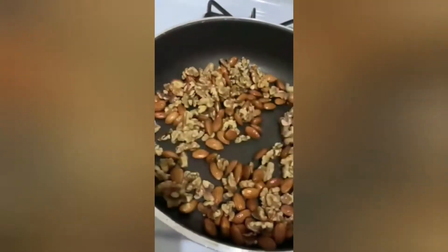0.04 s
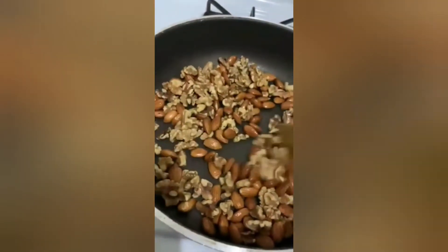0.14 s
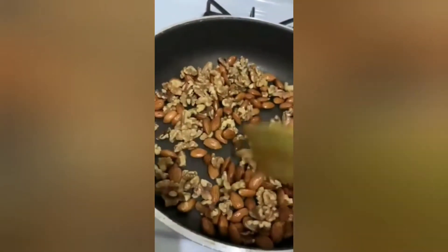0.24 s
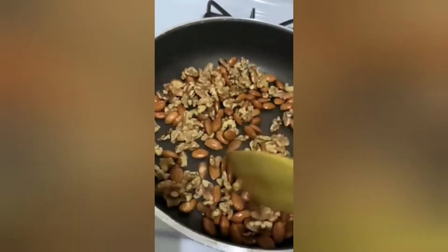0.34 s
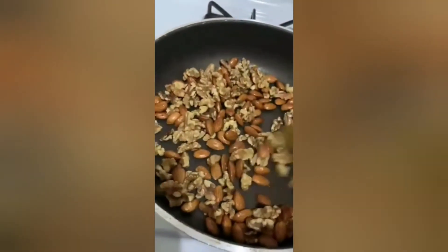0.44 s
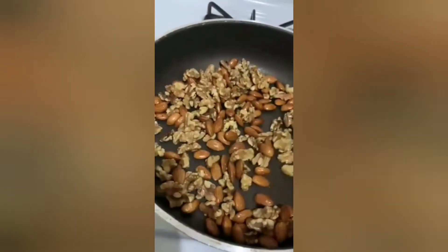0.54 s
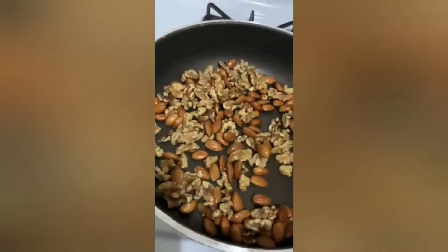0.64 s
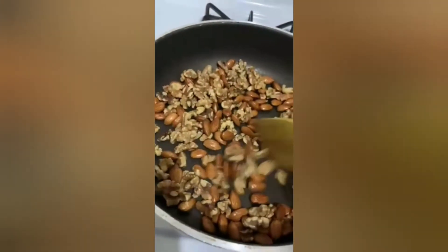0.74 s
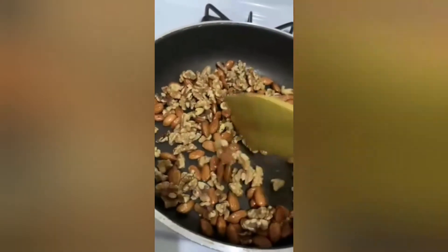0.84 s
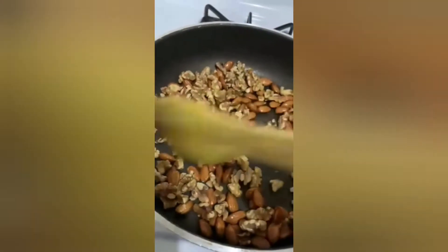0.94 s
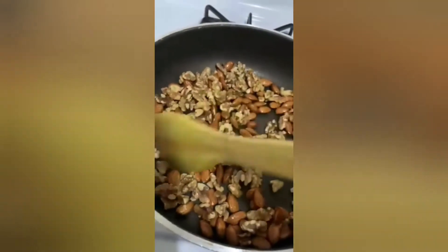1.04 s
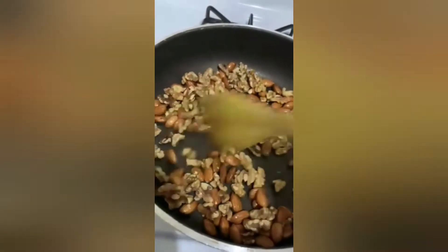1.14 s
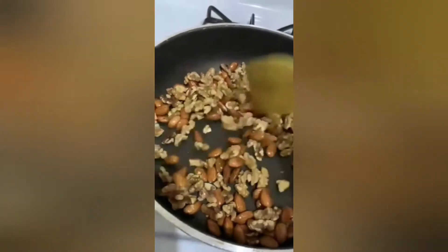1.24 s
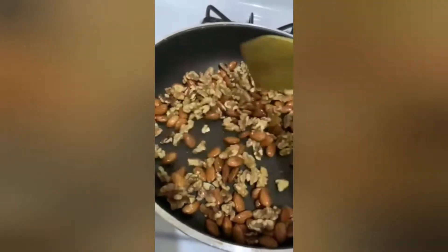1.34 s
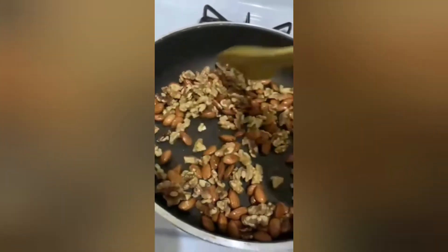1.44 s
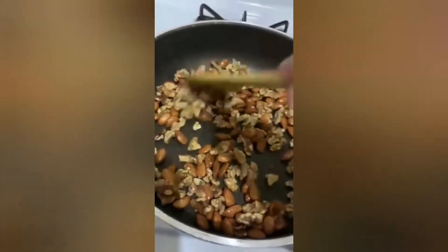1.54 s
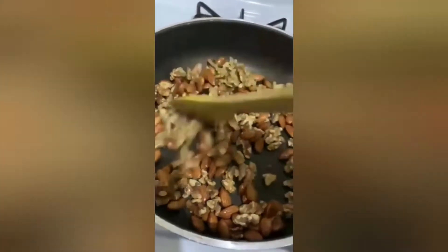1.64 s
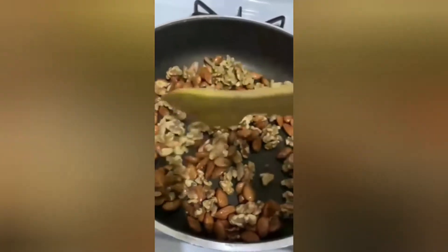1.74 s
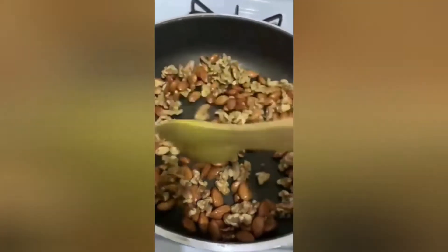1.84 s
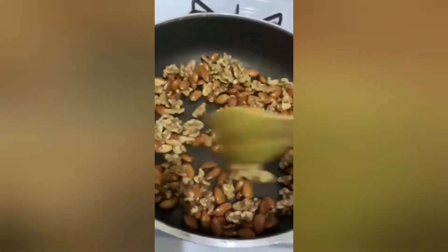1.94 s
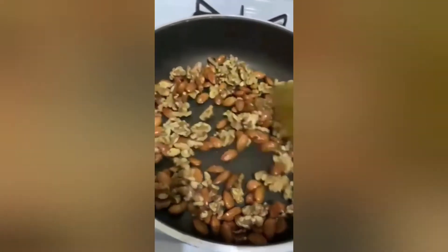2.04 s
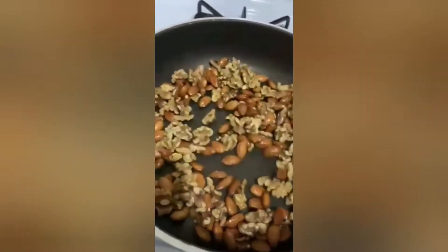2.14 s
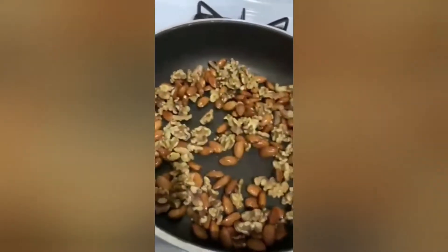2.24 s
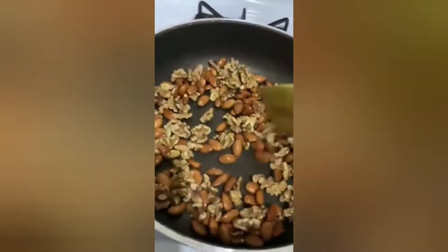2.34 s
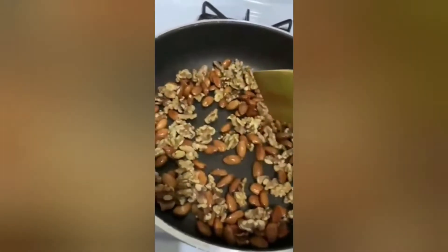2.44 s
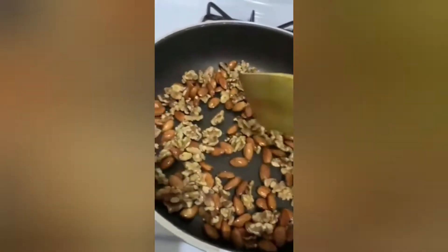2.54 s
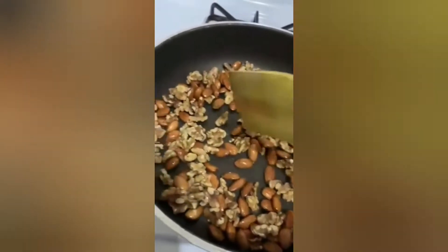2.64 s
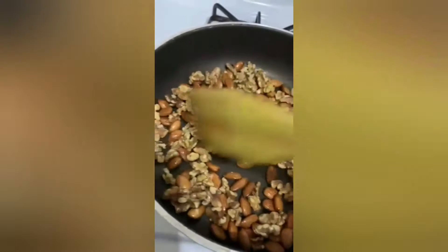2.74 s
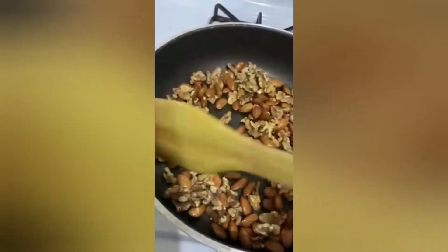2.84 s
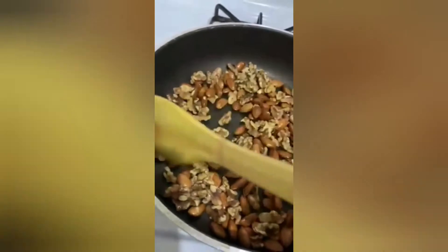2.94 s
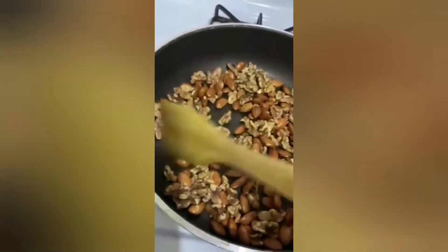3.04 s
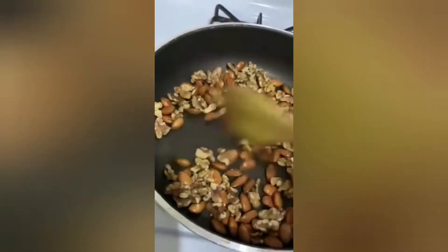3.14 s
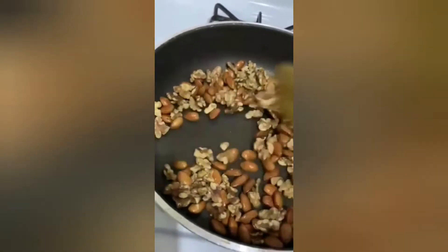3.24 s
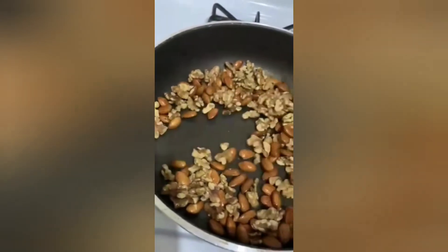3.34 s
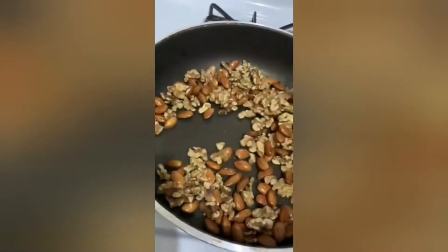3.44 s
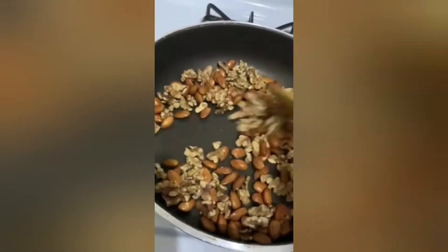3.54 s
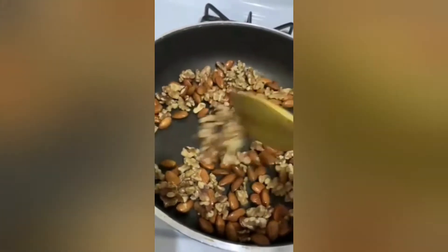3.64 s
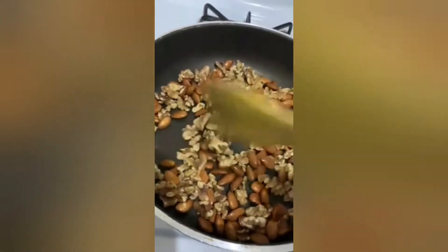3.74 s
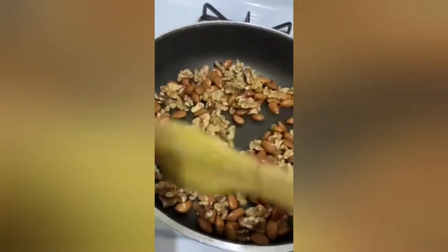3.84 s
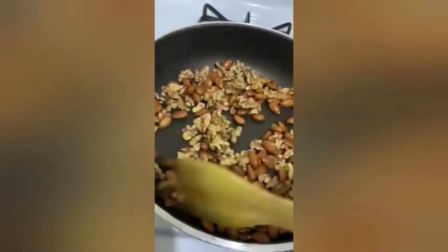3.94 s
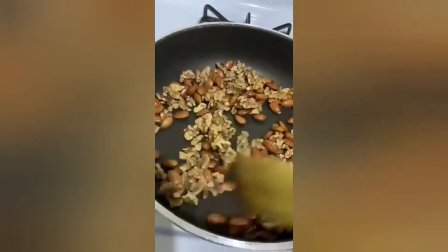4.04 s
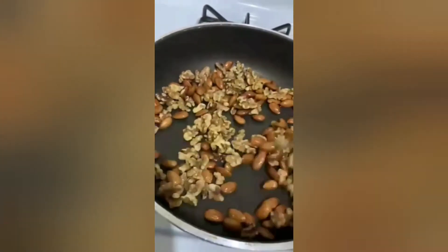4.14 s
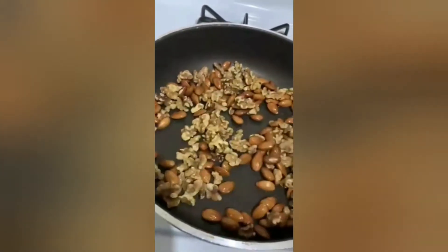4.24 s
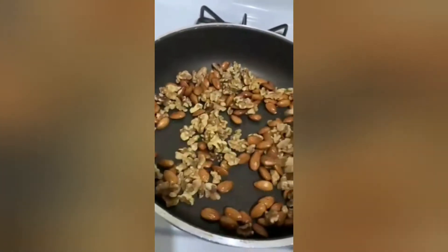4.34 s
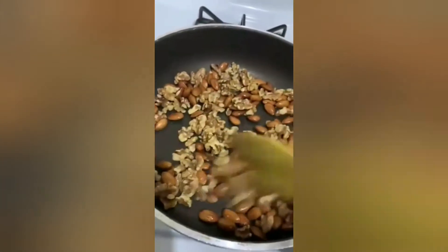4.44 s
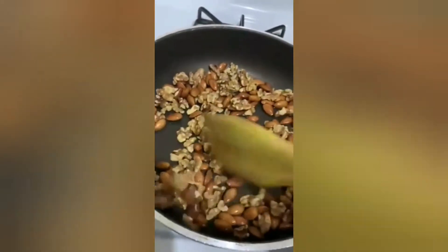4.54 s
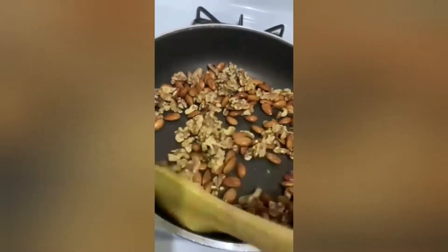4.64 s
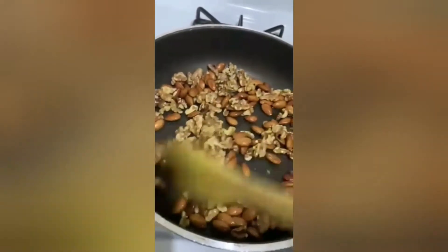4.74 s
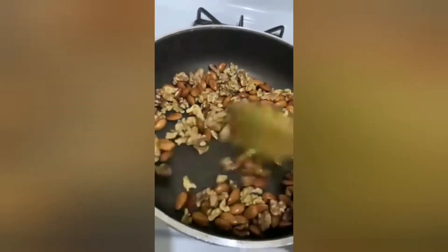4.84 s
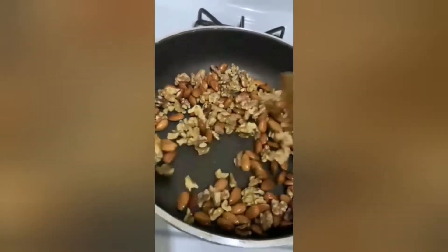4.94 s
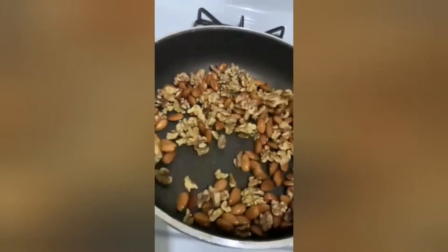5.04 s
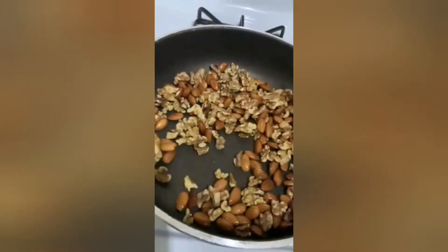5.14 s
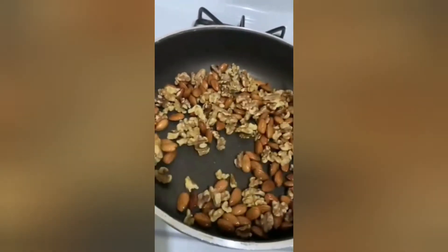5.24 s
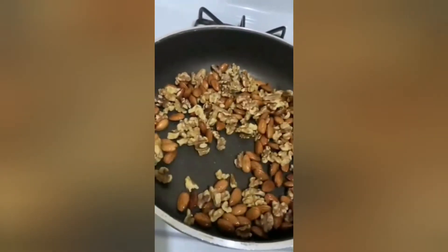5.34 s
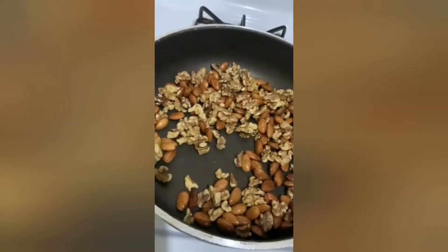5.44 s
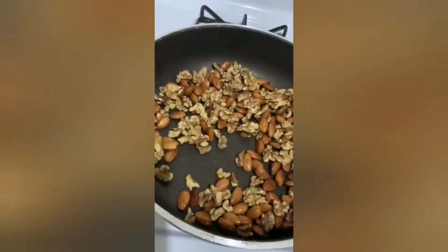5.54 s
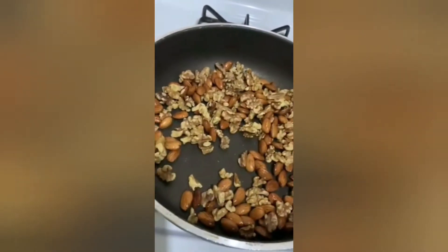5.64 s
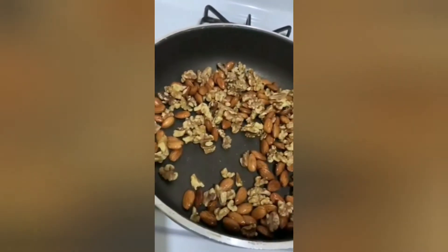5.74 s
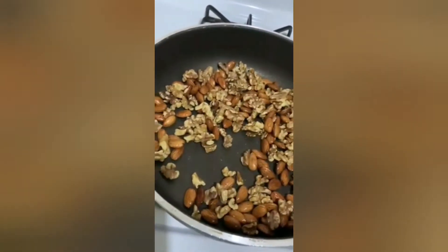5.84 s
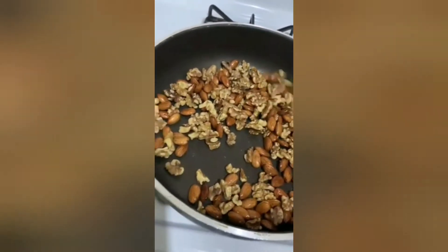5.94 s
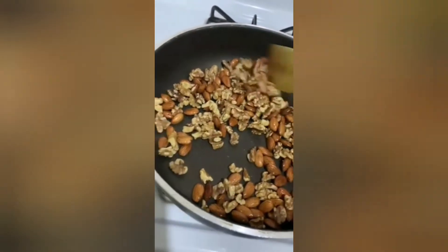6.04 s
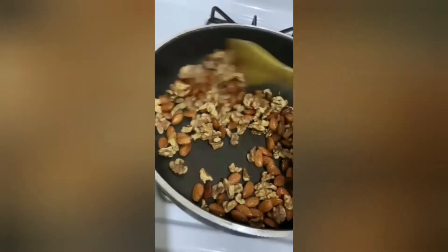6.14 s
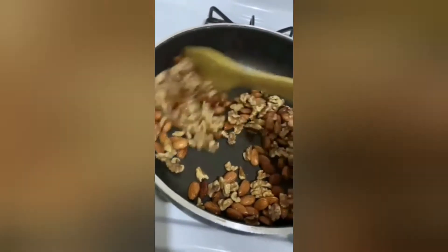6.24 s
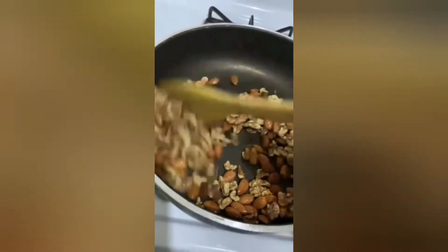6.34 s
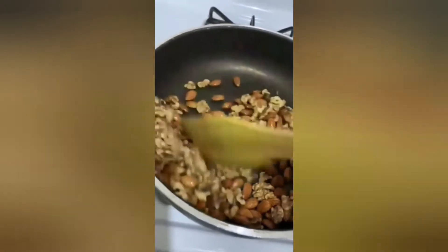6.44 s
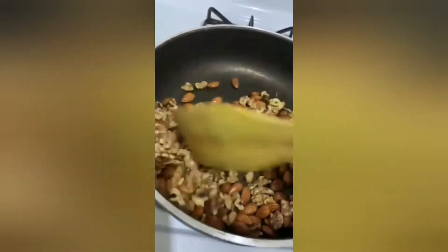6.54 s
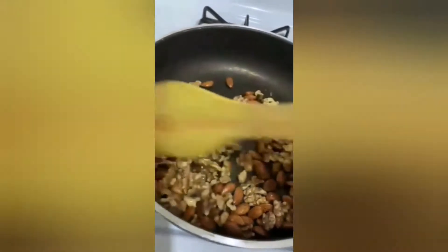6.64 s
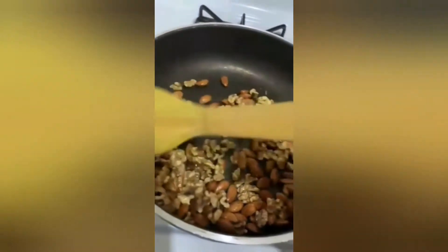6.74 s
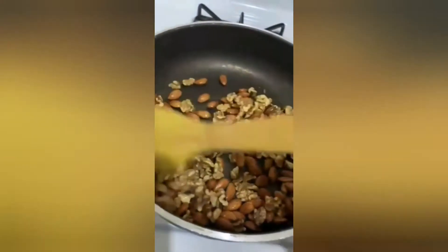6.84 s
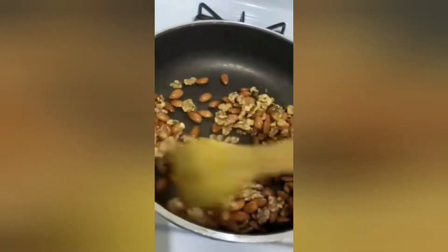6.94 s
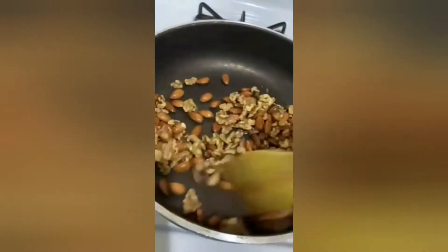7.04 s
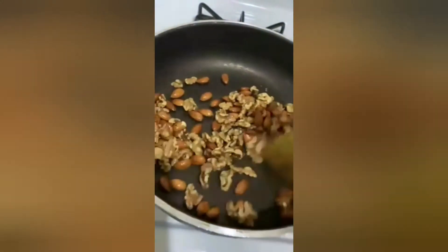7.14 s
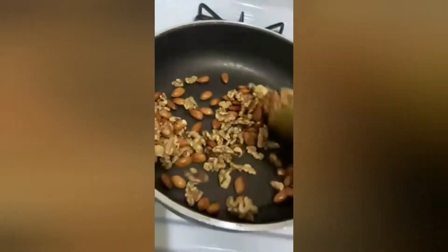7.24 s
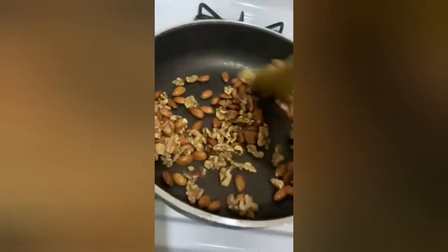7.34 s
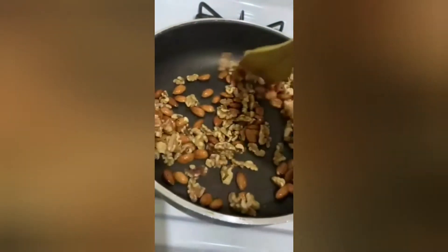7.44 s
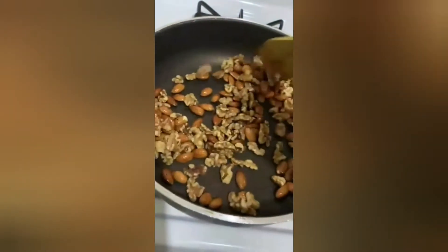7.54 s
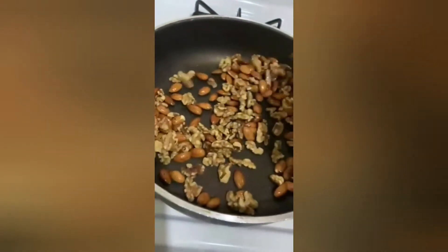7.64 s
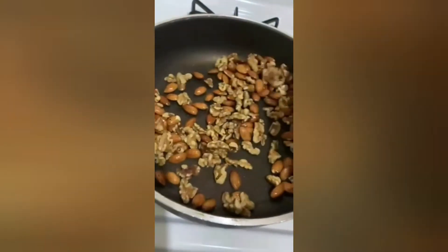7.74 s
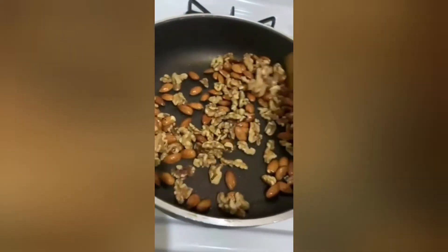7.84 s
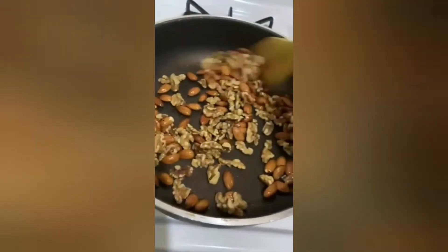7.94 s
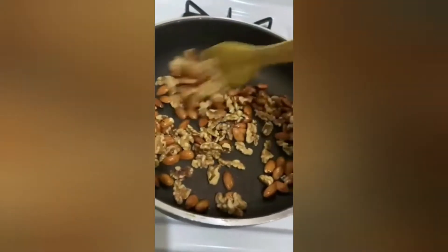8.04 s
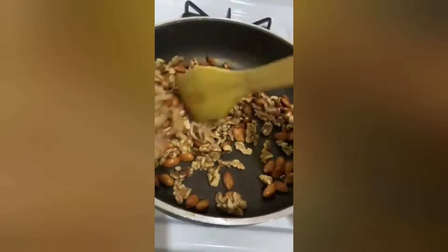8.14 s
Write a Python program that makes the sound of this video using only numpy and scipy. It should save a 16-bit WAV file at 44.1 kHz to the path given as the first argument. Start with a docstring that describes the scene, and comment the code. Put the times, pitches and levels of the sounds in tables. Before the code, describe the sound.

Close-up dry rattling of nuts pushed around a pan, woody spatula knocks and sharp little clicks over a very faint kitchen hum.

```python
"""Nuts stirred in a frying pan

Nuts are stirred with a wooden spatula in a pan on a stove, heard from close by in two channels.
Tumbling nuts are showers of small taps that ring the pan's modes; their sliding is coloured noise.
Spatula and larger nuts knock: a few woody cycles and a dry crack, with a brief ring of the pan.
Thin snaps are sharp pulses with a scatter of noise. Behind lie sparse kitchen echoes, broad noise,
a faint burner hiss and low hums that swell and fade."""
import sys
import numpy as np
from scipy import signal
from scipy.fft import rfft, irfft, next_fast_len
from scipy.io import wavfile
from scipy.ndimage import uniform_filter1d

SR = 44100
rng = np.random.default_rng(int(sys.argv[2]) if len(sys.argv) > 2 else 0)


def output_pcm(signal):
    """Save a mono or channel-first signal as 16-bit PCM at the path in sys.argv[1].

    Samples are clipped to [-1, 1] before scaling.
    """
    pcm = np.clip(np.atleast_2d(signal).T, -1, 1) * 32767
    wavfile.write(sys.argv[1], SR, np.round(pcm).astype(np.int16))


N = 362061
STRIKE = 3000  # samples in one strike, contact or burst

# Relative spectrum of dry sliding, also used for the burner: frequency_hz, density_db (per Hz)
SLIDE_SPECTRUM = [(800, 10), (2000, -0.5), (5000, 2.5), (6000, 2.5), (8000, 0.5), (10500, 2), (11850, -5.5),
                  (12150, -66)]
# Relative spectrum of a dry crack or click: frequency_hz, density_db (per Hz)
CRACK_SPECTRUM = [(500, 9), (1200, 9), (2200, 13.5), (3200, 13), (4500, 2.5), (7000, -13)]


def tumbling():
    """Nuts tap low modes softly and upper modes hard with dry clicks, and hiss as they slide over the pan."""
    # Pitch around which soft taps ring the pan as the heap moves over it: time_s, pitch_hz
    heap_pitch = [(0.2, 760), (1.15, 786), (1.9, 720), (2.3, 920), (3.05, 604), (3.6, 850), (4.4, 880),
                  (4.85, 790), (5.8, 433), (6.15, 786), (6.4, 865), (7.0, 970), (7.6, 850), (8.1, 890)]
    tumble_gain, tap_gain, hiss_gain = stirring()
    around_hz = np.interp(np.arange(N) / SR, *np.transpose(heap_pitch))
    soft, _ = taps(400, 300, 1560, contact_db=-4.5, around_hz=around_hz)
    hard, size = taps(260, 1550, 4000, contact_db=-4.5)
    clicks = signal.oaconvolve(size * rng.choice([-1., 1.], N), burst(0.0045))[:N]
    dry_clicks = gain_of(-16.5) * evened(colour(clicks, CRACK_SPECTRUM))
    body = tumble_gain * soft + tap_gain * (hard + dry_clicks)
    grains = gain_of(-15.5) * evened(colour(clicks, SLIDE_SPECTRUM))
    slide = noise(SLIDE_SPECTRUM, patchy_db=3.5) + grains
    return body, hiss_gain * slide


def stirring():
    """Gains of tumbling, hard taps and hiss: each surge climbs, holds and settles; powers add."""
    # Surges of stirring and of nuts scattering after knocks:
    # start_s, rise_s, hold_s, tumbling_db, hard_taps_db, hiss_db
    surges = [(-0.13, 0.097, 0.16, -62, -44.5, -44.5), (0.02, 0.1, 0.082, -37.5, -48, -49),
              (0.232, 0.1, 0.07, -37, -38.5, -39), (0.42, 0.046, 0.016, -47, -43.5, -44),
              (0.688, 0.021, 0.0048, -31.5, -39.5, -40), (1.041, 0.029, 0.0066, -31, -27.5, -30),
              (1.095, 0.041, 0.046, -29, -37, -66), (1.464, 0.013, 0.048, -36.5, -45.5, -43),
              (1.578, 0.027, 0.014, -33.5, -36.5, -41.5), (1.797, 0.037, 0.12, -32.5, -42, -40.5),
              (2.107, 0.13, 0.12, -43.5, -49.5, -47), (2.905, 0.0079, .005, -43, -65, -38),
              (3, 0.019, 0.075, -39, -50, -40), (3.047, 0.03, 0.069, -29.5, -36.5, -41.5),
              (3.258, 0.014, 0.08, -48, -49.5, -46), (3.437, 0.15, 0.004, -31.5, -37.5, -36),
              (3.847, 0.13, 0.053, -39, -41, -33.5), (4.057, 0.034, 0.12, -41, -44.5, -44.5),
              (4.289, 0.046, 0.074, -31.5, -35, -33.5), (4.467, 0.026, .005, -32, -39.5, -41),
              (4.617, 0.013, 0.085, -59, -64, -39), (4.709, 0.073, 0.085, -31.5, -34.5, -39.5),
              (4.96, 0.012, 0.074, -42, -48.5, -54), (5.648, 0.0065, 0.0092, -69, -58, -44),
              (5.62, 0.35, .115, -37.5, -48.5, -39), (6.007, 0.11, 0.13, -42, -52, -40),
              (6.186, 0.14, 0.069, -34.5, -43, -41), (6.691, 0.023, 0.027, -61, -58, -37.5),
              (6.782, 0.088, 0.31, -36.5, -43.5, -35.5), (7.077, 0.13, 0.079, -43.5, -43, -38.5),
              (7.287, 0.042, 0.21, -42.5, -48, -44.5), (7.612, 0.032, 0.0082, -48, -53, -41),
              (7.76, 0.13, 0.18, -38.5, -49.5, -37.5), (7.96, 0.07, 0.086, -29.5, -40, -38.5)]
    # Fall after a surge (dB per second): tumbling, hard_taps, hiss
    settle_db_per_s = [106, 128, 158]
    # Level between surges, as nuts keep rocking faintly: tumbling_db, hard_taps_db, hiss_db
    resting_levels = [-82.5, -90, -56.5]
    rise_db = 20  # climb of the level over one rise time
    t = np.arange(0, N + 64, 64) / SR
    start, rise, hold, *levels = np.transpose(surges)[:, :, None]
    climb_db = rise_db * np.minimum((t - start) / np.maximum(rise, .005) - 1, 0)
    after_s = np.maximum(t - start - rise - np.maximum(hold, 0), 0)
    gains = []
    for db, fall, rest_db in zip(levels, settle_db_per_s, resting_levels):
        surge_power = (gain_of(db + climb_db - fall * after_s) ** 2).sum(0)
        power = surge_power + gain_of(rest_db) ** 2
        gains.append(np.interp(np.arange(N) / SR, t, np.sqrt(power)))
    return gains


def taps(per_s, low_hz, high_hz, contact_db, around_hz=None):
    """Small taps of uneven size, clumped in time, each a short contact that rings a narrow group of modes."""
    spread_octaves = 0.75  # distance from the moving pitch at which taps are 6 dB weaker
    clumps = gain_of(4.0 * evened(uniform_filter1d(rng.standard_normal(N), size=800)))
    happens = rng.random(N) < per_s * clumps / SR  # per_s sets the density before clumping
    size = gain_of(2.33 * np.minimum(rng.exponential(1, N), 2.6)) * happens
    place, centres = rng.integers(0, 30, N), np.geomspace(low_hz, high_hz, num=30)
    if around_hz is not None:
        distance = np.log2(centres[place] / around_hz) / spread_octaves
        size = size * gain_of(-6 * distance ** 2)
    out = 0
    for k, hz in enumerate(centres):
        ring = pan_ring(hz, 0.61, 0.67, rise=0.00095)
        strike = ring + gain_of(contact_db) * abs(ring).max() * contact(hz, turns=1.67)
        out = out + signal.oaconvolve(size * (place == k), strike)[:N]
    return evened(out), size


def knocks():
    """Spatula and larger nuts: a few woody cycles and a dry crack, with a brief ring of the pan."""
    # Knocks: time_s, level_db, pitch_hz, crack_db and ring_db (both relative to the level)
    knock_list = [(0.08, -27.5, 1860, -8.5, -16), (0.105, -18, 1030, -16.5, -26),
                  (0.126, -17, 697, -32, -35), (0.245, -21.5, 1910, -16.5, -2),
                  (0.278, -25.5, 725, -10.5, 0), (0.327, -22, 1170, -36, -14), (0.379, -20.5, 1180, -35, 1),
                  (0.415, -23, 750, -15, -3), (0.484, -10, 3470, -19.5, -13), (0.636, -28.5, 1770, -12, 0),
                  (0.7, -16, 1420, -6, -0.5), (0.726, -18, 695, -36, -3), (0.829, -18, 1120, -39, -8.5),
                  (1.041, -32, 1850, -5.5, -13), (1.055, -28.5, 1740, -5, -21), (1.067, -23, 1760, 1, -6),
                  (1.076, -24, 1880, -0.5, -2), (1.0844, -4.5, 1200, -17, -4), (1.087, -7, 526, -18, -18),
                  (1.145, -21, 1100, -21, 0), (1.181, -17.5, 915, -24, -8), (1.199, -16.5, 970, -28, -18),
                  (1.281, -20, 780, -30, -7), (1.297, -14.5, 1166, -22.5, -5), (1.473, -19, 1960, -10, 1),
                  (1.51, -20, 1070, -28, -10), (1.605, -16, 1230, -28, 2), (1.613, -11, 774, -16.5, -14),
                  (1.644, -11.5, 730, -35, -0.5), (1.721, -27.5, 760, -19, 4),
                  (1.769, -25.5, 795, -23, -2.5), (1.82, -20.5, 1100, -21, -16), (1.83, -20, 940, -33, 0),
                  (1.856, -7.5, 1086, -21.5, 2), (1.857, -3.5, 483, -30, -6), (1.961, -24, 600, -12, -21),
                  (2.223, -32.5, 1800, -4, -27), (2.272, -28, 1800, -6, -10), (2.336, -27, 1800, -38, -1),
                  (2.396, -29, 1740, -7.5, 5), (2.912, -26, 1700, -20, -1), (2.996, -13.5, 1200, -12, -4),
                  (3.201, -24, 695, -32, -18), (3.251, -27.5, 780, -18, -1), (3.319, -30, 920, -26, -15),
                  (3.349, -20, 1140, -19.5, -9), (3.39, -26.5, 1800, -18, -3), (3.547, -20, 840, -41, -19),
                  (3.585, -12, 860, -16, -16), (3.606, -18.5, 884, -18, 0), (3.867, -26, 750, -13, -7),
                  (3.916, -25, 1320, -11, -3), (3.937, -7, 1230, -29, -7.5), (3.941, -16.5, 548, -40, -21),
                  (3.95, -28, 340, -40, -12), (3.993, -19, 1760, -35, -8), (4.1, -24, 740, -26, -7),
                  (4.116, -24.5, 1800, -35, 1), (4.13, -30, 1820, -27, -14), (4.148, -14, 790, -13, -8),
                  (4.327, -21, 1800, -40, -8), (4.354, -20.5, 1770, -36, -4), (4.398, -11.5, 1800, -21, -6),
                  (4.441, -24, 1120, -25, 6.5), (4.498, -14.5, 1220, -10.5, -6),
                  (4.517, -12, 1160, -24, -9), (4.631, -7.5, 1520, -20, -9), (4.637, -18, 470, -43, -7.5),
                  (4.649, -22.5, 354, -36, -20), (4.706, -21.5, 1820, -16, -7),
                  (4.716, -22.5, 1800, -37, -3), (4.75, -18, 1870, -34, -6), (4.861, -16.5, 590, -35, -6),
                  (4.955, -18, 1010, -47, -13), (5.566, -26, 1800, -16, -17),
                  (5.661, -16.5, 3020, -13.5, -25), (5.918, -27, 850, -39, -3), (5.96, -26.5, 1900, -32, 3),
                  (6.048, -35, 1430, -44.5, 10), (6.122, -16.5, 906, -34, -6), (6.225, -28, 1530, -11, -9),
                  (6.351, -18, 794, -20, -6.5), (6.388, -26, 770, -10, -5), (6.45, -18.5, 1200, -37, -14),
                  (6.462, -24.5, 800, -15, 0.5), (6.708, -17, 1370, -11, -9), (6.885, -18, 1160, -30, -25),
                  (6.938, -32, 1500, 3, -12), (6.985, -24, 1800, -1.5, -11), (7.206, -20.5, 864, -20, -4),
                  (7.258, -19, 1170, -14.5, -14), (7.282, -29, 1870, -29, -3), (7.358, -19, 1000, -40, -9),
                  (7.395, -19, 930, -30, -18), (7.437, -20.5, 1010, -34, -16),
                  (7.464, -18.5, 1180, -20.5, -4.5), (7.509, -22, 1610, -11, -6),
                  (7.551, -24.5, 950, -16, -7), (7.631, -26, 1050, -25, -3), (7.643, -27, 1210, 0, -7),
                  (8.119, -13.5, 1070, -21, -5), (8.161, -17.5, 1050, -26, -11),
                  (8.184, -18, 1190, -16, -2)]
    out, cracks = np.zeros((2, N + STRIKE))
    t = np.arange(STRIKE) / SR
    for s, level_db, hz, crack_db, ring_db in knock_list:
        at = slice(round(s * SR), round(s * SR) + STRIKE)
        ring = pan_ring(hz, 0.68, 0.75, rise=0.0008)
        ring = gain_of(ring_db) * ring / abs(ring).max()
        wood = gain_of(-7.0) * contact(hz, turns=2.6)
        out[at] += gain_of(level_db) * (wood + ring)
        onset = 1 - np.exp(-t / 0.00086)
        cracks[at] += gain_of(level_db + crack_db) * burst(0.013) * onset
    return (out + gain_of(8.5) * colour(cracks, CRACK_SPECTRUM))[:N]


def pan_ring(centre_hz, octaves, damping, rise):
    """The pan struck at one place: modes near the contact pitch answer most; soft contact rises slowly (s)."""
    # Modes of the loaded pan before shift, scatter and damping: frequency_hz, level_db, t60_s
    pan_modes = [(180, -20, 0.022), (253, -21, 0.38), (327, -5, 0.061), (403, -2.5, 0.15),
                 (455.4, -0.5, 0.1), (609, -3.5, 0.11), (735.2, 2, 0.1), (850, -4.5, 0.079),
                 (1011, -2, 0.046), (1130.5, 3.5, 0.05), (1235, -2.5, 0.043), (1370, 3.5, 0.018),
                 (1576, 2.5, 0.049), (1800, -4, 0.072), (1884, 2.5, 0.041), (2253, -9.5, 0.059),
                 (2593, -5, 0.05), (3015, -14, 0.16), (3706, -12, 0.11)]
    load_shift = .007  # typical share by which nuts lying on the pan shift a mode
    hz, db, t60 = np.transpose(pan_modes)[:, :, None]
    t = np.arange(STRIKE) / SR
    level, sign, shift = rng.standard_normal((len(pan_modes), 3)).T[:, :, None]
    hz = hz * (1 + load_shift * shift)
    near_db = -6 * (np.log2(hz / centre_hz) / octaves) ** 2
    envelope = gain_of(db + near_db + 1.38 * level - 60 * t / (t60 * damping))
    modes = np.sign(sign) * envelope * np.sin(2 * np.pi * hz * t)
    return modes.sum(0) * (1 - np.exp(-(t / rise) ** 2))


def contact(hz, turns):
    """Woody contact that swells for a few cycles (turns) and dies, sagging in pitch."""
    sag = 0.064  # fall of the pitch per cycle, as a share of hz
    u = hz * np.arange(STRIKE) / SR
    cycles = u + sag * u * (turns - u / 2)
    return np.sin(2 * np.pi * cycles) * (u / turns) ** 2 * np.exp(2 - 2 * u / turns)


def snaps():
    """Nut on nut and wood on metal: a sharp pulse and a brief wide scatter, too thin to wake the room."""
    # Thin snaps: time_s, level_db (relative), t60_s of the scatter (kept to at least 0.002)
    snap_list = [(0.2464, -29, 0.0095), (0.2766, -32.5, 0.014), (0.3295, -33.5, 0.095), (0.484, -35, 0.045),
                 (0.6998, -25.5, 0.013), (1.053, -29, 0.039), (1.076, -21, 0.021), (1.0852, -22.5, 0.077),
                 (1.4747, -30.5, 0.021), (1.964, -29.5, 0.0057), (2.44, -36.5, 0.016), (2.9134, -33, .012),
                 (2.9966, -32, 0.027), (3.2813, -11.5, 0.0013), (3.458, -34, 0.04), (3.869, -20.5, 0.0053),
                 (3.937, -29.5, 0.028), (4.2002, -36, 0.021), (4.498, -34, 0.032), (4.6308, -22, 0.046),
                 (5.661, -32.5, 0.033), (6.708, -26, 0.028), (6.886, -38, 0.022), (6.986, -25.5, 0.012),
                 (7.396, -35.5, 0.037), (7.6462, -28, 0.017), (8.05, -32.5, 0.021), (8.186, -33, 0.02)]
    # Relative spectrum of a snap: frequency_hz, density_db (per Hz)
    snap_spectrum = [(600, -35), (2000, -12), (4000, -1.5), (8000, -2.5), (10500, -4.5), (12500, -20)]
    apart = 0.62  # amplitude of the scatter private to each channel, against the shared scatter
    out = np.zeros((2, N + STRIKE))
    for s, level_db, t60 in snap_list:
        shared, left, right = (burst(max(t60, .002)) for _ in range(3))
        click = gain_of(-1.5) * (shared + apart * np.array([left, right]))
        click[:, :2] += (2.6, -1.6)
        # Mixing in the previous sample tilts the treble: the briefest snaps are brightest
        tilt = rng.uniform(-.3, .3) - np.exp(-t60 / .006)
        click[:, 1:] += tilt * click[:, :-1]
        out[:, round(s * SR):][:, :STRIKE] += gain_of(level_db) * click
    return gain_of(9.0) * colour(out, snap_spectrum)[:, :N]


def burst(t60):
    """A puff of noise that starts at once and dies by 60 dB in t60 seconds."""
    return rng.standard_normal(STRIKE) * gain_of(-60 * np.arange(STRIKE) / SR / t60)


def kitchen(x):
    """Sparse echoes of random sign, one in every 20 samples, each band dying at its own speed."""
    # Decay of the kitchen: frequency_hz, t60_s
    room_decay = [(300, 0.014), (800, 0.26), (3000, 0.12), (10000, 0.096)]
    echoes = np.zeros((2, 22000))
    at = np.arange(100, 21900, 20) + rng.integers(0, 20, (2, 1090))
    np.put_along_axis(echoes, at, rng.choice([-1., 1.], at.shape), 1)
    hz, t, z = signal.stft(echoes, SR, nperseg=256)
    decay = gain_of(-60 * t / read(room_decay, hz)[:, None])
    tail = signal.istft(z * decay, SR, nperseg=256)[1]
    return signal.fftconvolve(x[None], tail / np.linalg.norm(tail[0]), axes=1)[:, :N]


def background():
    """Broad kitchen noise, faint burner hiss and low hums whose pitch and level waver a little."""
    # Relative spectrum of the kitchen noise: frequency_hz, density_db (per Hz)
    air_spectrum = [(20, -32), (45, -14.5), (60, 0.5), (110, -2), (170, -5.5), (280, -5.5), (510, -12),
                    (700, -50), (1200, -25), (1800, -55), (5000, -46.5)]
    # Low hums of the kitchen: pitch_hz, wavering_hz
    hums = [(73, 2.86), (112, 2.24), (142, 2.18)]
    # Swell and fade of the hums, before their flutter: time_s, first_db, second_db, third_db
    hum_swell = [(0, -58, -55, -68), (0.5, -43.5, -54, -46.5), (0.85, -90, -63, -54.5),
                 (1.14, -47, -62, -46), (1.4, -62, -52.5, -54), (2.45, -52, -54, -45.5),
                 (2.7, -66, -78, -67), (2.97, -58, -57, -41.5), (3.7, -56, -50, -89), (4, -58, -47.5, -44),
                 (4.2, -51, -64, -60), (4.9, -46.5, -47, -52.5), (5.6, -47.5, -51, -56.5),
                 (7.2, -57, -51.5, -44), (7.5, -55, -45.5, -49.5), (8.21, -59, -48, -47.5)]
    out = gain_of(-50) * noise(air_spectrum, patchy_db=0)
    out += gain_of(-58) * noise(SLIDE_SPECTRUM, patchy_db=-4.5)  # burner
    s, *levels = np.transpose(hum_swell)
    for (hz, waver_hz), db in zip(hums, levels):
        drift, flutter = evened(uniform_filter1d(rng.standard_normal((2, N)), size=6000))
        level_db = np.interp(np.arange(N) / SR, s, db) + 2 * flutter
        phase = 2 * np.pi * np.cumsum(hz + waver_hz * drift) / SR
        out += gain_of(level_db) * np.sin(phase)
    return out


def noise(points, patchy_db):
    """Two partly alike channels of noise with patches that drift in time and frequency."""
    # Likeness of the noise in the two channels: frequency_hz, likeness (0 to 1)
    channel_likeness = [(130, 1.), (270, 1), (600, 0.83), (1300, 0.1), (2700, 1), (6000, 1), (12000, 0.99)]
    frames, hz = N // 128 + 5, np.fft.rfftfreq(512, 1 / SR)
    a, b, c, d, patches = rng.standard_normal((frames, 257, 5)).T
    patches = uniform_filter1d(patches, size=6, axis=0)
    patches = evened(uniform_filter1d(patches, size=14, axis=1))
    same = np.clip(read(channel_likeness, hz), 0, 1)[:, None]
    left = a + 1j * b
    right = same * left + np.sqrt(1 - same ** 2) * (c + 1j * d)
    z = np.array([left, right]) * gain_of(patchy_db * patches)
    channels = signal.istft(z, nperseg=512, noverlap=384)[1][:, :N]
    return evened(colour(channels, points))


def colour(x, points):
    """Filters along the last axis by a spectrum in dB."""
    size = next_fast_len(x.shape[-1])
    gain = gain_of(read(points, np.fft.rfftfreq(size, 1 / SR)))
    return irfft(rfft(x, size) * gain, size)[..., :x.shape[-1]]


def read(points, hz):
    """Reads a table between its points along a logarithmic frequency scale."""
    f, value = np.transpose(points)
    return np.interp(np.log(hz + 1), np.log(f + 1), value)


def evened(x):
    """Scales to an RMS of one."""
    return x / np.sqrt(np.mean(x ** 2) + 1e-20)


def gain_of(db):
    """Turns dB into an amplitude factor."""
    return np.exp(np.asarray(db) * np.log(10) / 20)


def scene():
    """Tumbling and knocks wake the kitchen's echoes; snaps, sliding and background join without echoes."""
    body, slide = tumbling()
    near = body + knocks()
    return near + gain_of(-7.0) * kitchen(near) + snaps() + slide + background()


def record(dry):
    """The channels differ in phase and level; then the band limit."""
    # Stepped phase lead of left over right: frequency_hz, lead_rad
    left_lead = [(0, 0), (170, 0), (330, -.6), (520, -.6), (1300, .2), (1980, .5), (2580, 1.8), (3620, 1.7),
                 (4220, 3.1), (5430, 3.3), (6200, 6.3), (7490, 6.4), (8350, 9.4), (9560, 9.5),
                 (10400, 12.5), (12000, 12.6), (12500, 15.7)]
    # Level of left over right: frequency_hz, level_db
    left_over_right = [(250, -1.5), (400, -1), (640, -4.5), (1150, -4.5), (1800, -0.5), (3770, -0.5)]
    size = next_fast_len(N + 4096)
    hz = np.fft.rfftfreq(size, 1 / SR)
    f, lead = np.transpose(left_lead)
    # Each channel takes half the difference, in opposite directions
    half = gain_of(read(left_over_right, hz) / 2) * np.exp(.5j * np.interp(hz, f, lead))
    channels = irfft(rfft(dry, size) * np.array([half, 1 / half]), size)[:, :N]
    low_pass = signal.firwin(255, 12700, window=("kaiser", 7), fs=SR)  # edge in Hz
    return signal.oaconvolve(channels, low_pass[None], "same")


dry = scene()
out = record(dry)
output_pcm(out)
```